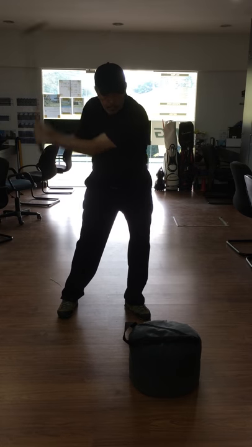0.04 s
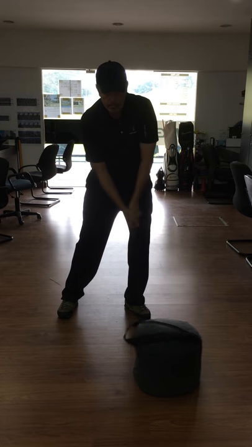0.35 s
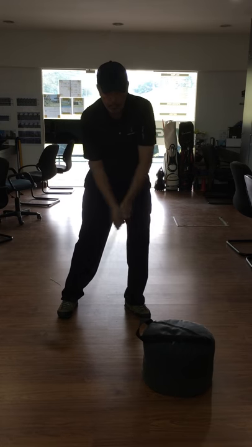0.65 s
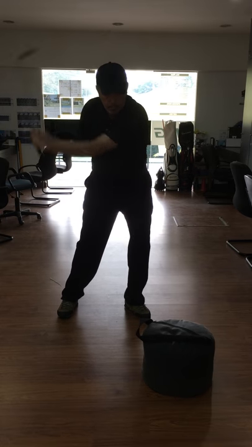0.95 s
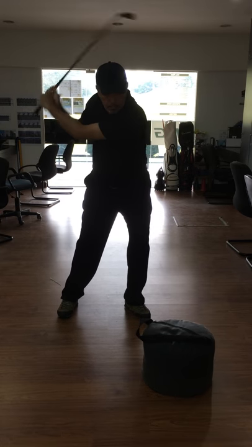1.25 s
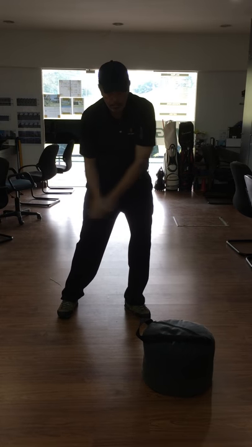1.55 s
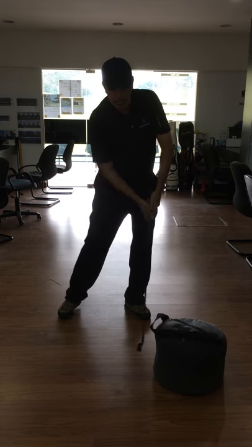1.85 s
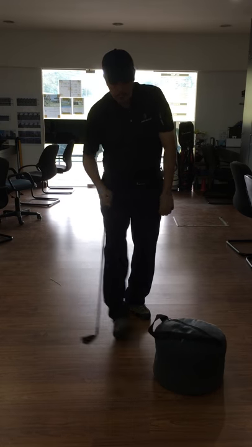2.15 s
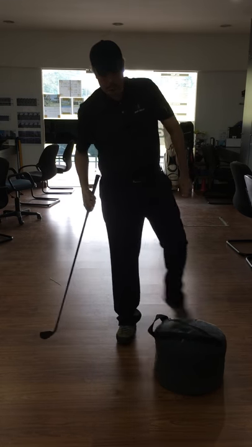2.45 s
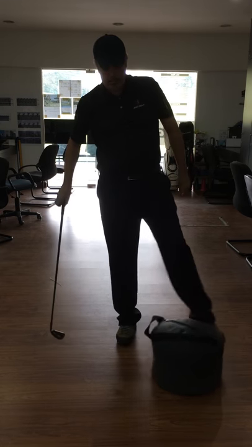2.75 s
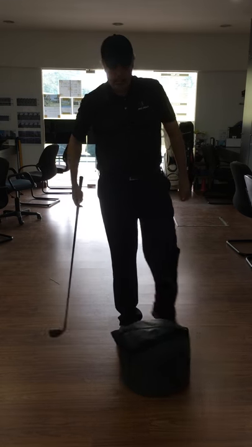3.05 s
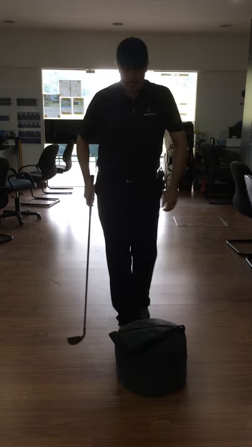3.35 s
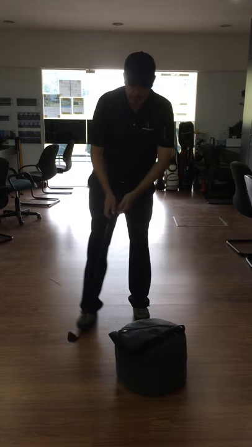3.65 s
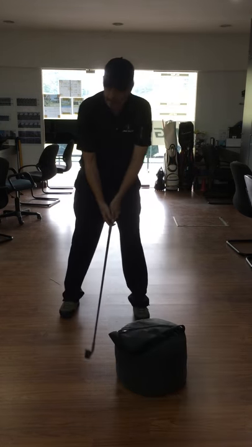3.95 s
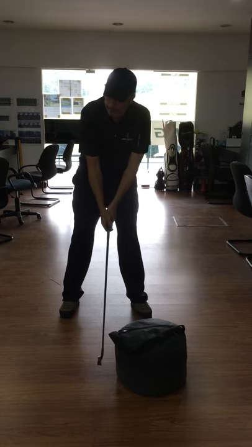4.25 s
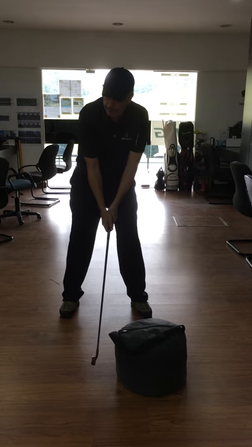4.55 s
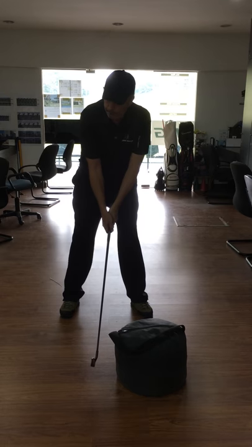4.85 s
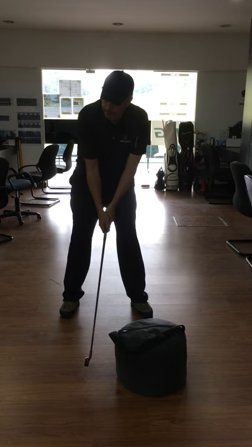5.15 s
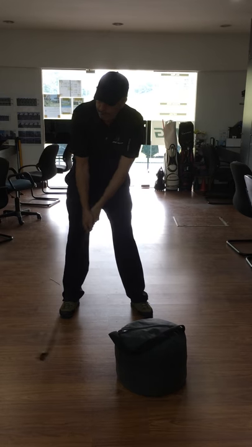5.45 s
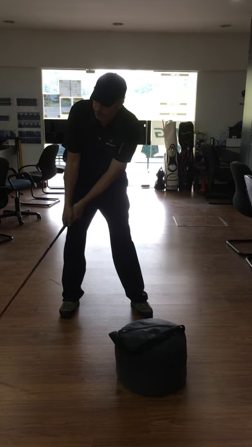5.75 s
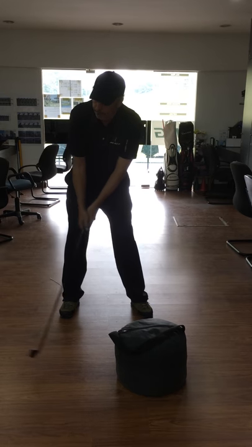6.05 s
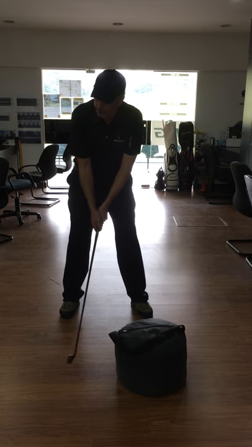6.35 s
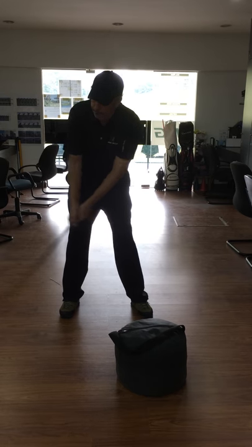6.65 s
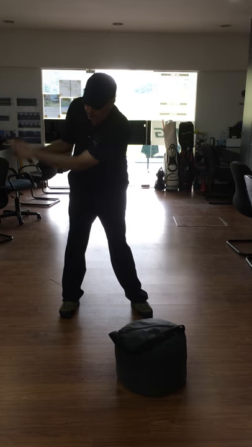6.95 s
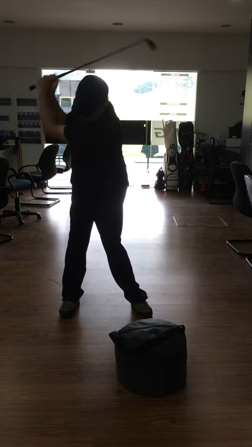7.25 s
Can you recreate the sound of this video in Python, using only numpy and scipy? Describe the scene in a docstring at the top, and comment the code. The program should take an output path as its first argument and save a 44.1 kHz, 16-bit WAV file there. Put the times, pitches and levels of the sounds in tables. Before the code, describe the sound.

An air conditioner hums low and steady in a bare, echoing room with a wooden floor, heard through one nearby microphone. At about 0.4 seconds a golf club gives a very short, dull swish and tiny shaft ticks, then smacks loudly into a padded bag. The cover cracks, the stuffing thumps, the club rings faintly and the room booms on. A second, similar blow lands at about 1.8 seconds, its low boom fading slowly.

Everything afterwards is far quieter. From about 2.8 to 3.3 seconds a foot slides the bag over the boards with a soft hiss. Light footsteps fall between 2.8 and 4.5 seconds, with a tiny rubber sole chirp near 3.9 and small scuffs around 3.9 and 4.2. Clothes rustle faintly with the movements, and again, barely audible, from about 6.2 to 7.5 seconds under the continuing hum.

```python
"""Over an air conditioner's hum, a golf club swishes down and smacks into a padded impact bag, twice.
One microphone stands in a bare, echoing room with a wooden floor, near enough to catch the shaft ticking.
Each blow cracks on the cover, thumps the stuffing, rings the club and sets the room's low modes booming.
Far quieter, a foot then slides the bag back over the boards; shoes scuff and settle, clothes rustle."""
import sys
import numpy as np
from scipy import signal
from scipy.fft import rfft, irfft
from scipy.io import wavfile

SR = 44100
rng = np.random.default_rng(int(sys.argv[2]) if len(sys.argv) > 2 else 0)


def digitize_waveform(pressure):
    """Quantize a signal to 16-bit integers and store it at the path in sys.argv[1].

    Rows of a 2-D input are taken as channels; values are limited to [-1, 1].
    """
    field = np.atleast_2d(pressure).T
    bounded = np.clip(field, -1, 1)
    quanta = np.round(bounded * 32767).astype(np.int16)
    wavfile.write(sys.argv[1], SR, quanta)


N = 330309
TIME = np.arange(N) / SR

# blows on the bag: t/s, swish/dB, crack/dB, thump/dB, slap/dB, club ring f/Hz, club ring/dB
BAG_BLOWS = [(0.4394, -27, -11, -2.5, -23, 2836, -39), (1.7583, -27, -11.5, -3, -21, 1527, -36)]
# air rushing round the club head (every colour is a level per hertz): f/Hz, level/dB
SWISH_COLOUR = [(30, -15), (80, -2), (200, 4.5), (400, -9.5), (650, -19), (1000, -43), (3000, -41),
                (12000, -59)]
# crack of the cover, direct to the microphone: f/Hz, level/dB
CRACK_COLOUR = [(200, -10), (500, 6), (1500, -0.5), (2600, -4), (4000, -1.5), (6000, -8.5), (9000, -10.5),
                (15000, -12.5)]
# the crack off the nearest surfaces: delay/s, level/dB
CRACK_REFLECTIONS = [(.0052, -35), (.0095, -18)]
# the thump off floor, ceiling and walls: delay/s, level/dB
THUMP_REFLECTIONS = [(.0094, -0.5), (0.015, -1), (0.022, -5.5)]
# slap of the cover as the room returns it, first and second blow: f/Hz, level/dB
FIRST_SLAP_COLOUR = [(250, -33), (430, 3), (745, -3.5), (945, -5.5), (1080, -12.5), (1430, -5), (2050, -13),
                     (2880, -11.5), (3250, -15.5), (3550, -11), (4000, -15), (7240, -17.5), (15000, -27)]
SECOND_SLAP_COLOUR = [(250, -7.5), (400, 4.5), (633, -6), (723, -10.5), (931, -5), (1270, -12), (1540, -8),
                      (2240, -16), (4240, -19), (4850, -16), (7800, -23), (9750, -21.5), (15000, -34)]
# resonances of club and bag: f/Hz, width/Hz, gain/dB
RESONANCES = [(610, 44, 2.5), (740, 83, -4), (950, 67, 0.5), (1660, 160, -0.5), (4300, 510, -1.5),
              (7000, 320, 2.5)]
# low modes of bag and room: f/Hz, level/dB, t60/s
LOW_MODES = [(40, -30.5, 1.2), (72.4, -19, 3.9), (77.1, -26, 1.4), (102.4, -35, 2.0), (106.2, -7, .62),
             (131.3, -32, 4.1), (127, -11, 0.78), (144.3, -15.5, 0.56), (159, -27.5, 1.2), (176, -19, 3.13),
             (186.2, -20.5, 1.4), (206.7, -14, 0.63), (213.4, -25, 2.8), (223, -39.5, 1.9),
             (250, -23, 0.96), (268, -23, 1.15), (290, -35.5, 1.6), (294.7, -38.5, 2.5), (322, -27.5, 0.84),
             (369, -38, 0.6), (441, -33.5, 0.68), (527.5, -40, 0.9), (553, -37, 0.61), (589, -35.5, 0.71)]
# the many weak modes between them, blurred into a rumble: f/Hz, level/dB
RUMBLE_COLOUR = [(20, -32.5), (55, 5.5), (130, 0.5), (220, 4), (320, 0), (450, -16.5), (900, -60)]
# reverberation time of the bare room: f/Hz, t60/s
ROOM_DECAY = [(100, 2.1), (250, 1.8), (450, 0.47), (900, 1.17), (1600, 1.21), (2900, 1.09), (4000, 0.94),
              (5500, 0.85), (7700, 0.68), (11000, 0.52), (15000, 0.34)]
# grip and shaft ticking in the downswing: t/s, level/dB
SHAFT_TICKS = [(.416, -51), (.4265, -46.5), (1.735, -51.5), (1.7473, -47)]
# the foot pushes the bag: t/s, length/s, level/dB
PUSHES = [(2.755, 0.52, -49.5)]
# hiss of the bag on the boards: f/Hz, level/dB
BAG_HISS_COLOUR = [(530, -33), (900, -11), (1470, -3.5), (1700, -5), (2020, -4), (3340, -4), (8350, 0.5),
                   (12700, -8.5), (15100, -19), (16000, -20)]
# feet on floor and bag: t/s, knock/dB, thud/dB
FOOTFALLS = [(2.785, -49.5, -63), (3.089, -57, -43), (3.37, -55.5, -46), (3.997, -48.5, -50),
             (4.226, -54.5, -57), (4.469, -64, -55), (4.539, -57, -56)]
# knock of a heel: f/Hz, level/dB
HEEL_COLOUR = [(100, -10), (250, 3), (400, 4), (650, -3.5), (1100, -18), (2200, -16), (5000, -36),
               (12000, -51)]
# a shoe brushes the bag or twists on the boards: t/s, length/s, level/dB
SHOE_SCUFFS = [(2.755, 0.043, -59), (3.91, 0.095, -62.5), (4.225, 0.095, -62.5)]
# hiss of a scuff: f/Hz, level/dB
SHOE_COLOUR = [(500, -14), (1500, 7.5), (2700, -1), (4000, -2), (6300, -7), (8000, -13.5), (14000, -16),
               (17000, -30)]
# a rubber sole chirps as it turns: t/s, length/s, level/dB
SOLE_CHIRPS = [(3.865, 0.072, -68), (3.918, 0.045, -62.5)]
# chirp of the rubber: f/Hz, level/dB
RUBBER_COLOUR = [(2500, -37), (3400, -6), (3900, -6), (4800, -8), (6100, -4), (7200, -13), (9000, -14),
                 (15000, -21)]
# swings, steps and changes of stance that stir the clothes: t/s, length/s, level/dB
BODY_MOVES = [(.1, .9, -79), (1.2, 0.81, -82), (2.15, 0.6, -70), (3.5, .8, -75.5), (4.68, 0.12, -73),
              (4.75, 0.33, -78), (6.2, .45, -84), (6.65, .9, -78)]
# rustle of trousers and shirt: f/Hz, level/dB
RUSTLE_COLOUR = [(800, -16), (3000, 10.5), (6500, 2), (10000, -4.5), (15000, -5.5)]
# tones of the air conditioner's compressor: f/Hz, rms level/dB
COMPRESSOR_TONES = [(48.4, -63), (72.4, -59), (144, -79), (146.5, -66), (191.8, -59), (239.8, -86),
                    (287.8, -64.5), (311.8, -72), (383.8, -66), (407.8, -78), (479.8, -85.5),
                    (527.7, -80.5), (551.7, -79), (647.7, -79.5), (791.7, -77.5)]
# rush of its fan: f/Hz, level/dB
FAN_COLOUR = [(22, -22.5), (45, -11.5), (68, -5), (82, 0), (97, 1), (112, -2), (140, -4.5), (190, -6.5),
              (260, -9.5), (400, -12), (600, -14), (1050, -15), (1450, -21.5), (2000, -22), (2500, -29),
              (3100, -31), (4500, -38), (8000, -41.5), (15000, -47.5)]


def blows():
    """The club meets the bag: swish, crack, thump and ring, then the room's answer."""
    out = np.zeros(N)
    overtone_ratio, overtone_db = 2.57, -11.5   # the club's next bending mode, relative to its main ring
    for blow, slap_colour in zip(BAG_BLOWS, (FIRST_SLAP_COLOUR, SECOND_SLAP_COLOUR)):
        s, swish_db, crack_db, thump_db, slap_db, ring_hz, ring_db = blow
        rush = from_db(swish_db) * swish(rise_s=0.0078)
        add(out, rush, s - len(rush) / SR)
        add(out, from_db(crack_db) * crack(decay_s=0.0016), s)
        add(out, from_db(thump_db) * echoed(thump(hz=158.6, decay_s=0.0056), THUMP_REFLECTIONS), s)
        add(out, from_db(thump_db + 1.38) * boom(build_s=0.019, split_hz=0.32), s)
        add(out, from_db(ring_db) * club_ring(ring_hz, t60=1.5, width_hz=360), s)
        overtone = club_ring(ring_hz * overtone_ratio, t60=0.95, width_hz=400)
        add(out, from_db(ring_db + overtone_db) * overtone, s)
        add(out, from_db(slap_db) * slap(slap_colour), s)
        add(out, from_db(-21.5) * reverberation(RUMBLE_COLOUR, build_s=0.008), s)
    return out


def crack(decay_s, size=SR // 8):
    """The club face snaps the cover taut; the nearest surfaces repeat the snap."""
    snap = noise(CRACK_COLOUR, size) * np.exp(-TIME[:size] / decay_s)
    return echoed(snap, CRACK_REFLECTIONS)


def thump(hz, decay_s, size=SR // 8):
    """Squeezed stuffing or a trodden board pushes out a heavily damped swing of air."""
    t = TIME[:size]
    return np.sin(2 * np.pi * hz * t) * np.exp(-t / decay_s)


def boom(build_s, split_hz, size=3 * SR):
    """Low modes swell as the thump crosses the room, then ring on; each is a slowly beating pair."""
    t, modes = TIME[:size], 0
    for k, (hz, db, t60) in enumerate(LOW_MODES):
        # neighbouring low modes start in opposite directions, the crowded upper ones at random
        phase = k * np.pi + 2 * np.pi * rng.random() * (hz > 240)
        modes = modes + from_db(db) * np.sin(2 * np.pi * hz * t + phase) * decay(t60, size)
    return modes * (1 - np.exp(-t / build_s)) * np.cos(np.pi * split_hz * t)


def slap(colour):
    """The cover's slap comes back from the walls, coloured by the resonances of club and bag."""
    sound = reverberation(colour, build_s=0.0064)
    for hz, width_hz, gain_db in RESONANCES:
        b, a = signal.iirpeak(hz, hz / width_hz, fs=SR)
        sound = sound + (from_db(gain_db) - 1) * signal.lfilter(b, a, sound)
    return sound


def swish(rise_s, size=SR // 6):
    """Air pushed ahead of the club head: a dull rush that grows until contact."""
    time_to_contact = TIME[:size][::-1]
    return noise(SWISH_COLOUR, size) * np.exp(-time_to_contact / rise_s)


def club_ring(hz, t60, width_hz, size=2 * SR):
    """The club's ringing partials, smeared by the room into a dying band of noise."""
    band = signal.butter(2, [hz - width_hz / 2, hz + width_hz / 2], "band", fs=SR, output="sos")
    return rms_one(signal.sosfilt(band, rng.standard_normal(size))) * decay(t60, size)


def shaft_ticks(decay_s=0.0018, size=SR // 20):
    """Grip and shaft give tiny dry clicks under load, just before contact."""
    out = np.zeros(N)
    for s, db in SHAFT_TICKS:
        add(out, from_db(db) * noise(CRACK_COLOUR, size) * np.exp(-TIME[:size] / decay_s), s)
    return out


def sliding_bag(edge_hz, brightening, top_db):
    """Fabric hisses over the boards; the top comes only with speed and dies first."""
    gain = strokes(PUSHES, sharpness=1.04, room_db=3, t60=1.0)
    hiss = rubbing(gain, BAG_HISS_COLOUR, grain_db=0.5)
    dull = signal.sosfiltfilt(signal.butter(2, edge_hz, fs=SR, output="sos"), hiss)
    top_gain = from_db(top_db) * (gain / gain.max()) ** brightening
    return dull + top_gain * (hiss - dull)


def steps(size=SR // 8):
    """Soft heel knocks reach the microphone direct and through the room, with a thud of the boards."""
    out = np.zeros(N)
    for s, knock_db, thud_db in FOOTFALLS:
        knock = noise(HEEL_COLOUR, size) * np.exp(-TIME[:size] / 0.037)
        add(out, from_db(knock_db) * knock, s)
        add(out, from_db(knock_db - 2) * reverberation(HEEL_COLOUR, build_s=0.006), s)
        add(out, from_db(thud_db) * thump(hz=103, decay_s=0.042, size=SR // 3), s)
    return out


def soles():
    """Shoes scuff, and the rubber chirps where it grips."""
    scuffs = strokes(SHOE_SCUFFS, sharpness=0.84, room_db=3, t60=1.0)
    chirps = strokes(SOLE_CHIRPS, sharpness=0.94, room_db=1, t60=1.0)
    return rubbing(scuffs, SHOE_COLOUR, grain_db=1.4) + rubbing(chirps, RUBBER_COLOUR, grain_db=1.0)


def clothes():
    """Cloth rubs with every move, faint at the microphone."""
    gain = strokes(BODY_MOVES, sharpness=0.64, room_db=-3, t60=0.9)
    return rubbing(gain, RUSTLE_COLOUR, grain_db=1.5)


def air_conditioner(waver_db, waver_rad):
    """Room tone: slightly unsteady compressor tones and two motors over the rush of the fan."""
    hum = 0
    for hz, db in COMPRESSOR_TONES:
        phase = 2 * np.pi * (hz * TIME + rng.random()) + waver_rad * drift(1.51)
        hum = hum + from_db(db + waver_db * drift(5)) * np.sin(phase)
    drone = motors(hz=96.8, beat_hz=1.594, dip_at_s=4.234)
    return np.sqrt(2) * (hum + drone) + from_db(-54) * noise(FAN_COLOUR)


def motors(hz, beat_hz, dip_at_s):
    """One motor's drone swells and sinks with a narrow rumble; a slightly slower one beats against it."""
    first = from_db(-54) + from_db(-64) * (drift(11) + 1j * drift(11))
    second = -from_db(-59.5) * np.exp(-2j * np.pi * beat_hz * (TIME - dip_at_s))
    return np.real((first + second) * np.exp(2j * np.pi * hz * TIME))


def reverberation(colour, build_s, size=2 * SR):
    """The room's diffuse answer to a short sound: it builds up, then each band dies at its own rate."""
    hz = np.fft.rfftfreq(size, 1 / SR)
    spectrum, out = rfft(noise(colour, size)), 0
    centres = np.geomspace(60, 16000, 20)
    for centre, weights in zip(centres, np.eye(len(centres))):
        band = irfft(spectrum * at_hz(np.c_[centres, weights], hz), size)
        out = out + band * decay(at_hz(ROOM_DECAY, centre), size)
    return out * (1 - np.exp(-(TIME[:size] / build_s) ** 2))


def echoed(sound, reflections):
    """The direct sound followed by its early reflections."""
    out = sound.copy()
    for delay_s, db in reflections:
        add(out, from_db(db) * sound, delay_s)
    return out


def strokes(rows, sharpness, room_db, t60):
    """Gain of rubbing strokes: each speeds up and slows in one arch, then lingers in the room."""
    power = 0
    for s, length_s, db in rows:
        speed = np.sin(np.pi * np.clip((TIME - s) / length_s, 0, 1))
        power = power + (from_db(db) * np.abs(speed) ** sharpness) ** 2
    feedback = np.exp(-2 * np.log(1000) / (t60 * SR))
    room_power = signal.lfilter([1 - feedback], [1, -feedback], power + 1e-18)
    return np.sqrt(power + from_db(room_db) ** 2 * room_power)


def rubbing(gain, colour, grain_db):
    """Friction hiss of a surface that catches unevenly."""
    return gain * noise(colour) * from_db(grain_db * drift(150))


def noise(colour, size=N):
    """Noise of a given colour, rms 1."""
    gain = from_db(at_hz(colour, np.fft.rfftfreq(size, 1 / SR)))
    return rms_one(irfft(rfft(rng.standard_normal(size)) * gain, size))


def drift(points_per_s):
    """Random wander, spread about 1."""
    return np.interp(TIME * points_per_s, np.arange(4096), rng.standard_normal(4096))


def decay(t60, size):
    """Gain that falls 60 dB in t60 seconds."""
    return np.exp(-np.log(1000) * TIME[:size] / t60)


def add(out, sound, s):
    """Mix a sound in from time s on."""
    start = max(round(s * SR), 0)
    part = sound[:max(len(out) - start, 0)]
    out[start:start + len(part)] += part


def at_hz(points, hz):
    """Read a table on a log-frequency axis."""
    f, value = np.transpose(points)
    return np.interp(np.log(np.maximum(hz, 1)), np.log(f), value)


def from_db(db):
    """Decibels to gain."""
    return 10 ** (np.asarray(db) / 20)


def rms_one(x):
    """Scale to rms 1."""
    return x / np.sqrt(np.mean(x ** 2) + 1e-20)


def scene():
    """Club, bag, golfer and room tone at one microphone."""
    slide = sliding_bag(edge_hz=5400, brightening=0.8, top_db=1.3)
    action = blows() + shaft_ticks() + slide + soles() + clothes() + steps()
    return (action + air_conditioner(waver_db=1.0, waver_rad=0.22))[None]


def record(dry):
    """The microphone sheds the deepest bass, the loudest peaks are rounded and the top is cut."""
    low_cut_hz, high_cut_hz, ceiling = 22, 15500, 0.75
    thin = signal.sosfilt(signal.butter(1, low_cut_hz, "high", fs=SR, output="sos"), dry)
    rounded = thin / (1 + (thin / ceiling) ** 6) ** (1 / 6)
    return signal.sosfilt(signal.ellip(10, 0.1, 80, high_cut_hz, fs=SR, output="sos"), rounded)


dry = scene()
out = record(dry)
digitize_waveform(out)
```